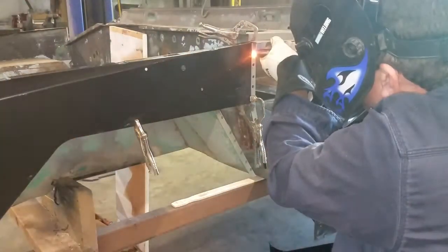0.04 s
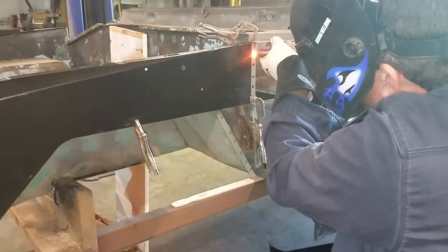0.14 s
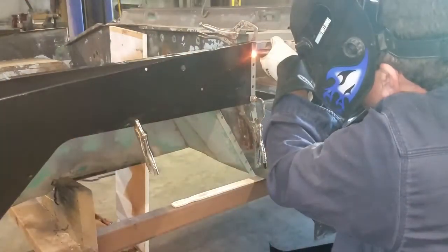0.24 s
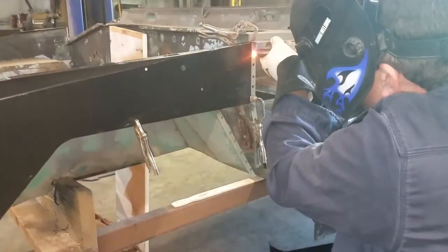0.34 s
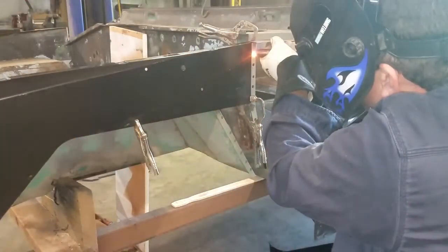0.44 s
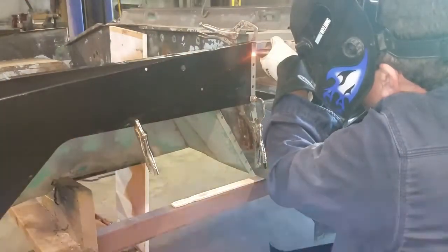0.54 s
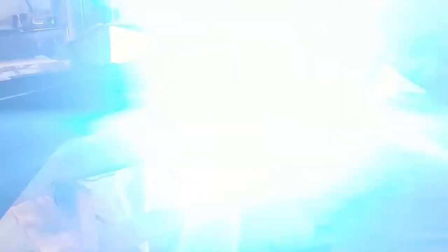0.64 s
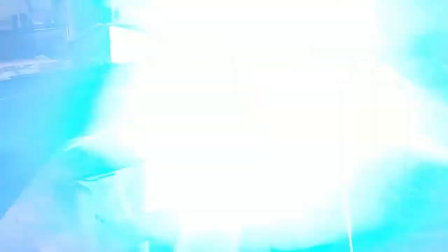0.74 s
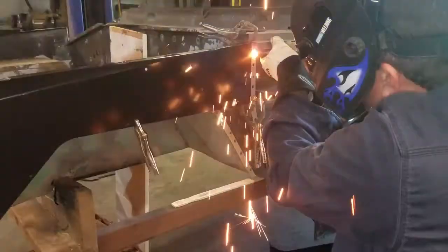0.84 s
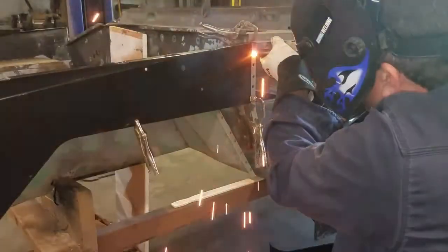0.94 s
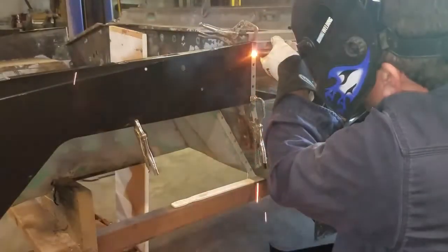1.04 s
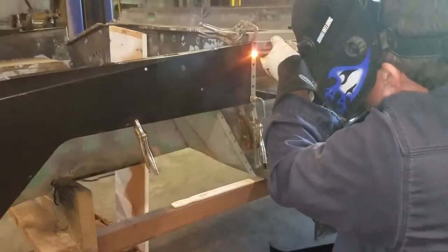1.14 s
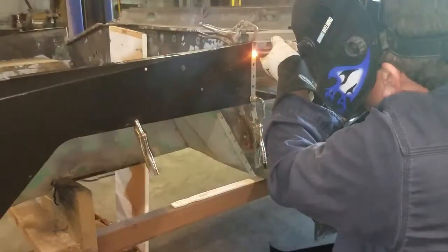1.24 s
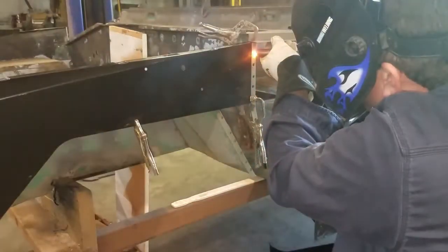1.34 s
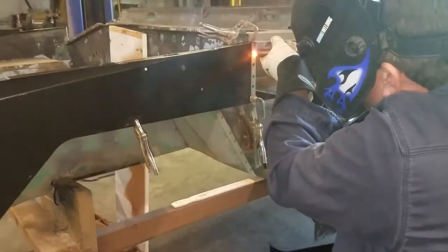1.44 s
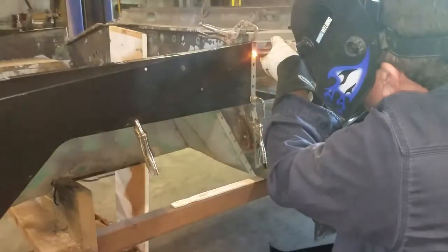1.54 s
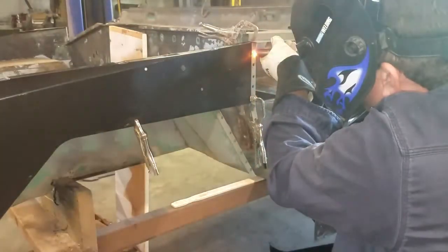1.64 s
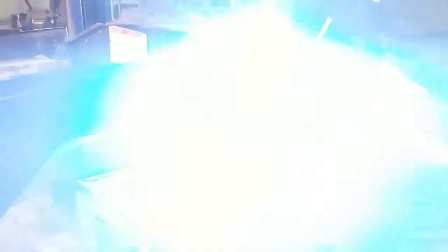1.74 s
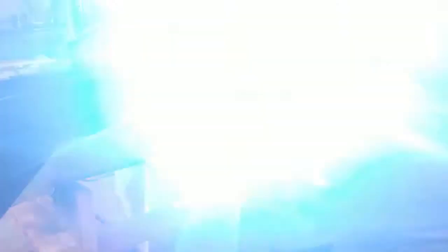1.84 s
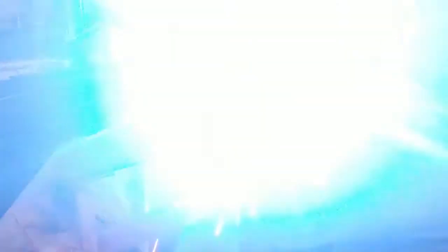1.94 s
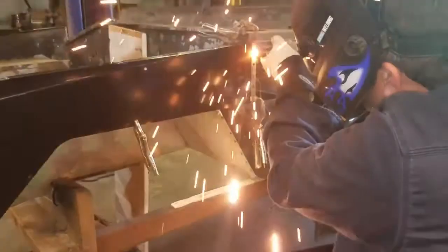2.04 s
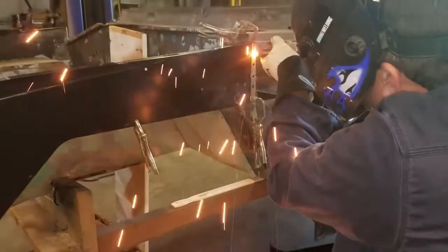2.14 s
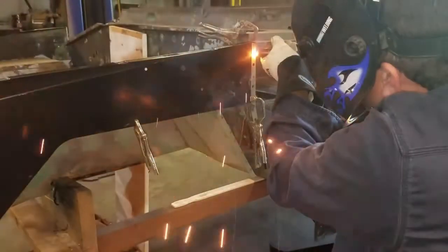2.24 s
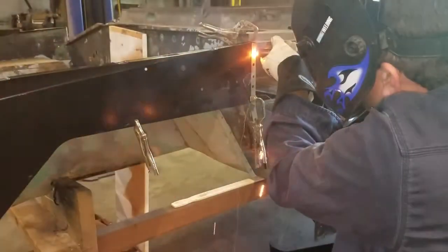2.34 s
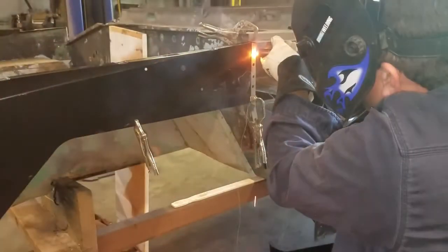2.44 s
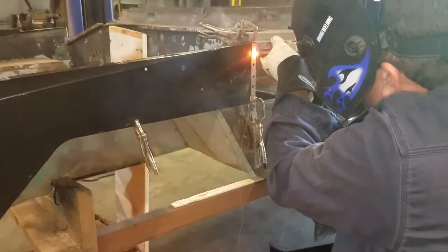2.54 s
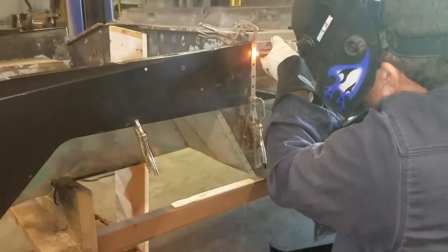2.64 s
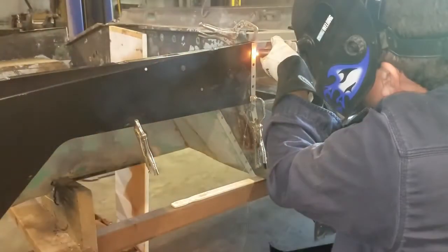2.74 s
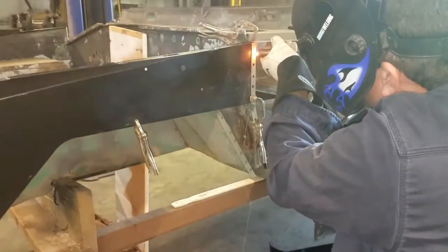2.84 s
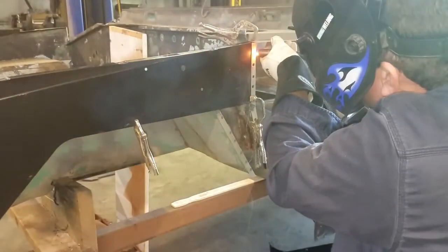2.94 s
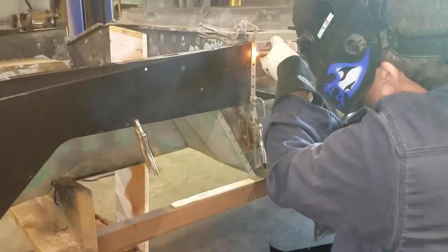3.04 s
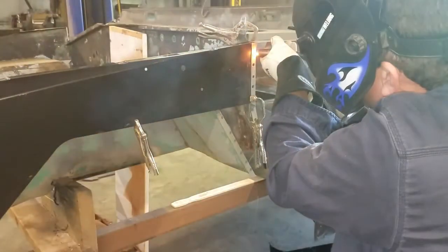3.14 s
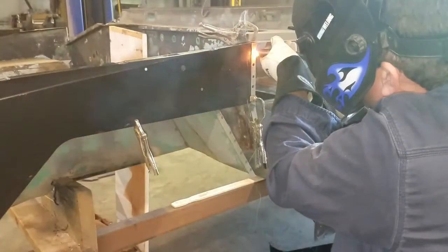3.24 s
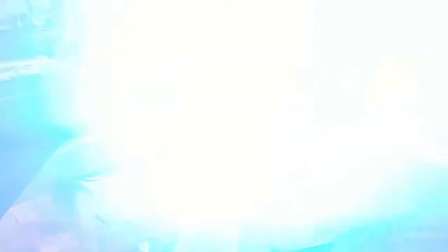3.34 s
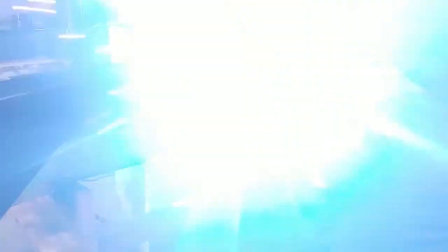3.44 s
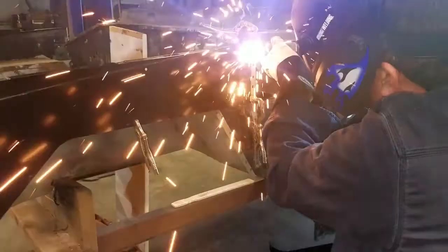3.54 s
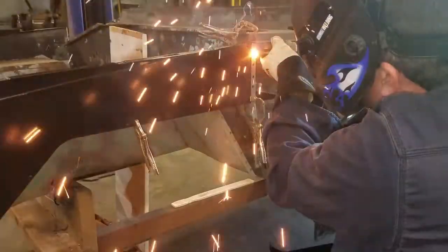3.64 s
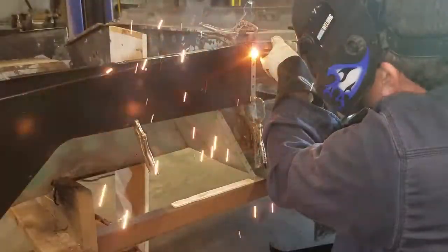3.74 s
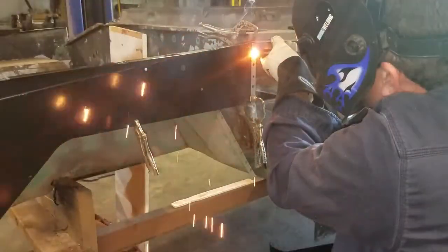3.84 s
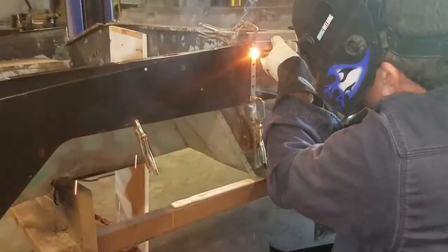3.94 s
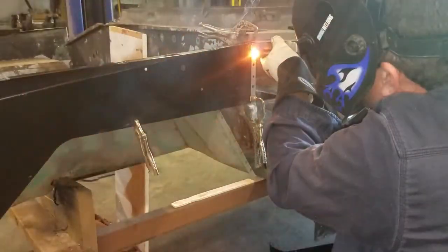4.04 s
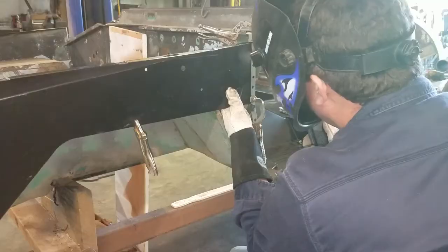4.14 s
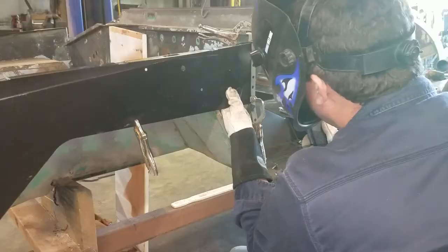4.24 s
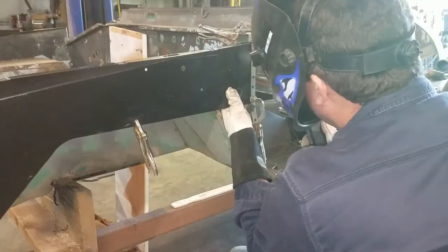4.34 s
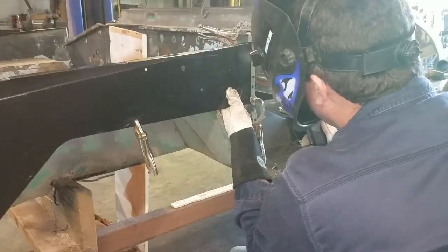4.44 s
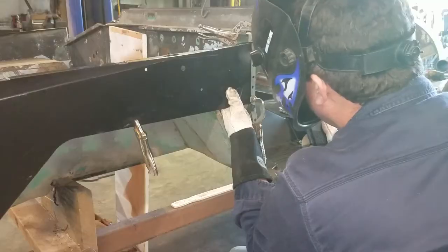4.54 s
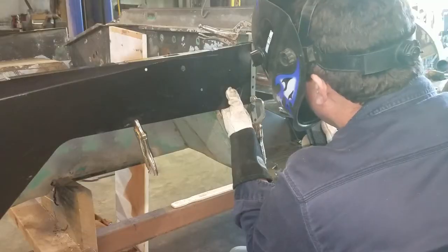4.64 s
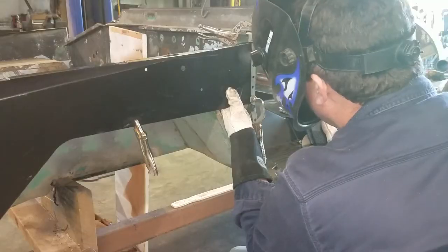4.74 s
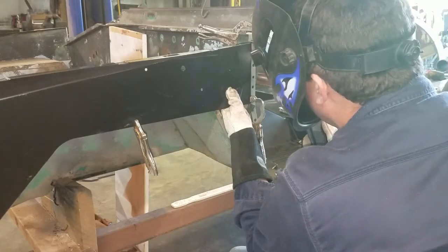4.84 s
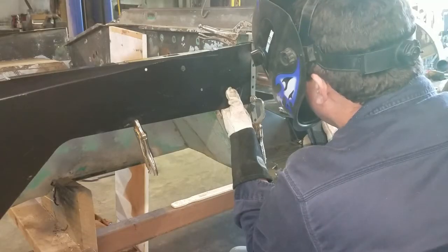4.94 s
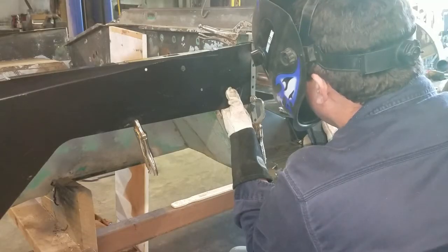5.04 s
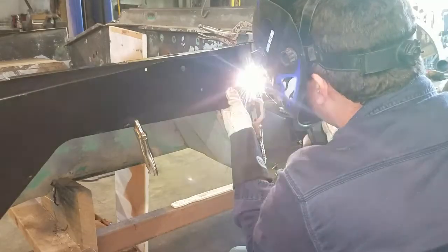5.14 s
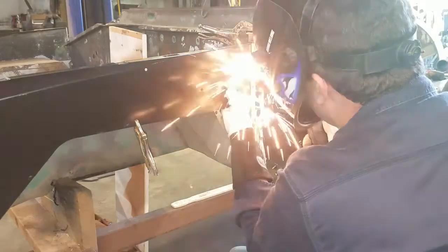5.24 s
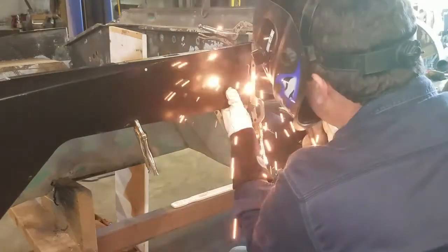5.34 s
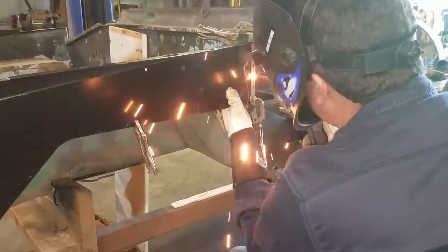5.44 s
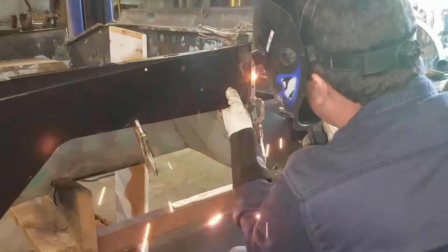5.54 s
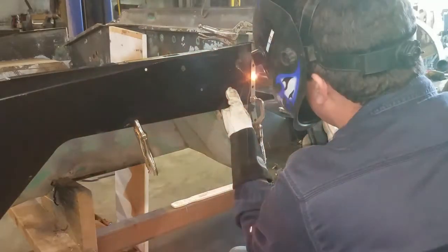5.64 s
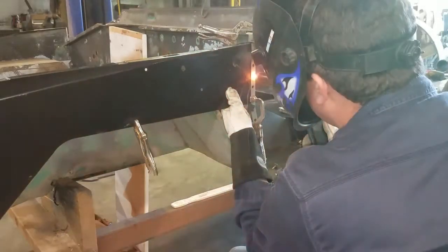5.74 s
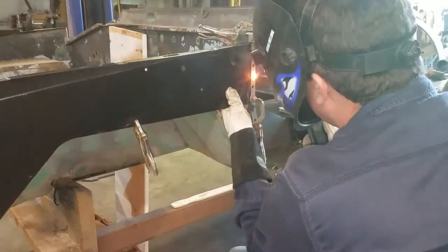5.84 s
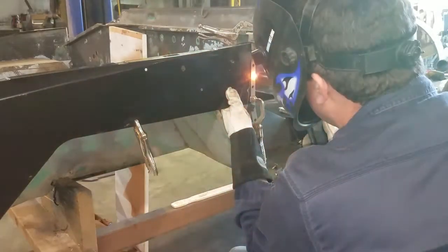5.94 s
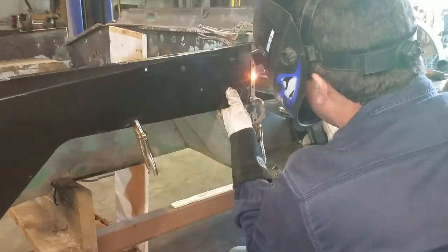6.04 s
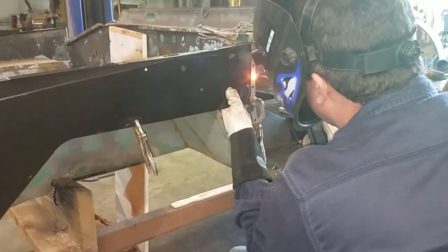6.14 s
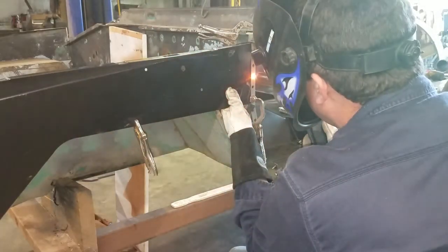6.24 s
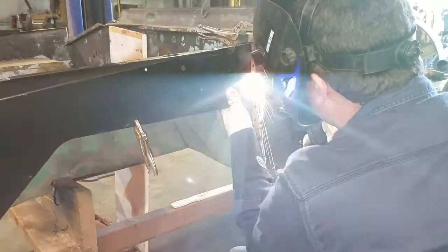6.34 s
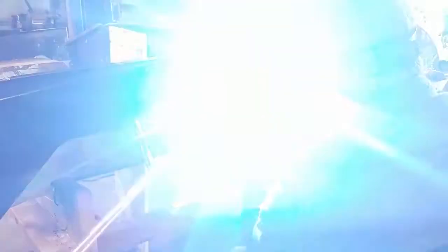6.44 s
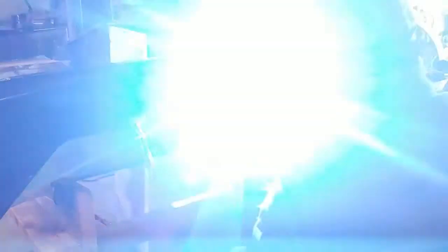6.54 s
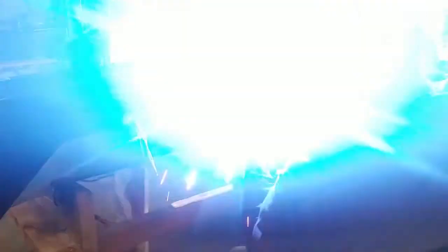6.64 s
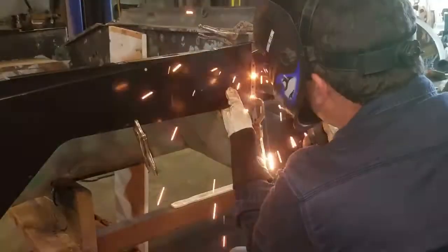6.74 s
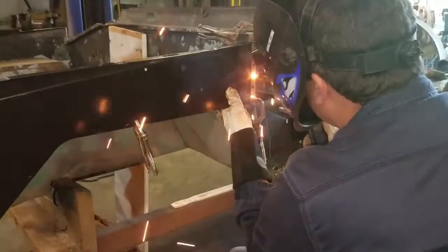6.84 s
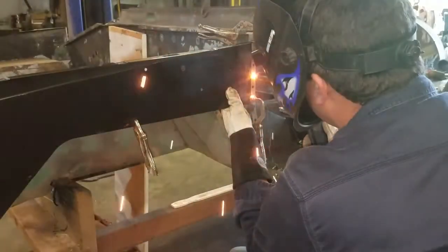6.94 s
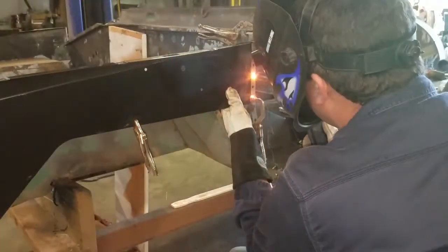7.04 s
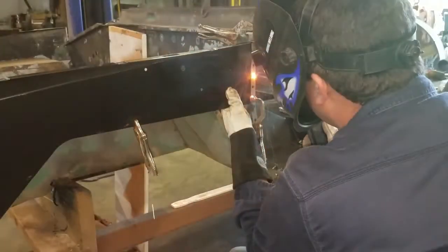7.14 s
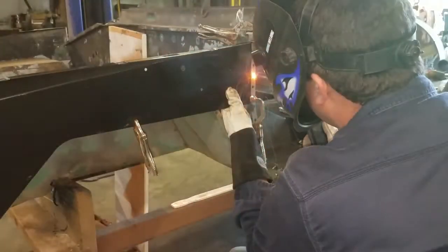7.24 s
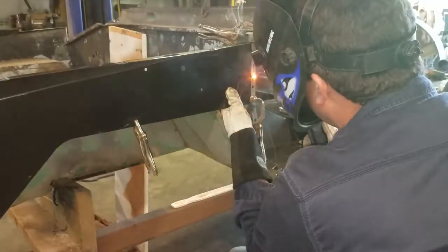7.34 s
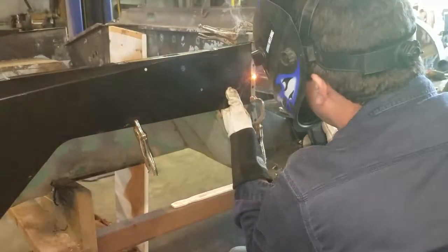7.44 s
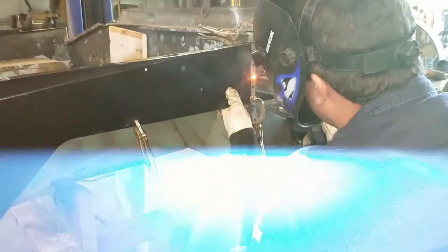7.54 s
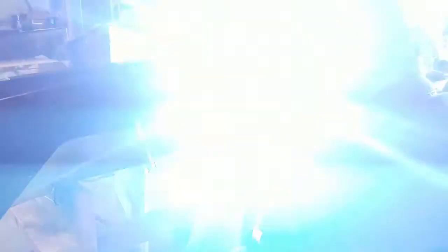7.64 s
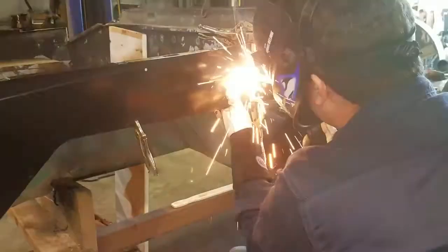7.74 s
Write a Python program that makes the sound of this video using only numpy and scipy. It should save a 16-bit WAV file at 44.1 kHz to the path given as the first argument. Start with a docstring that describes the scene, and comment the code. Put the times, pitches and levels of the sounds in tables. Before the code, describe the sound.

Heard in stereo close to the torch, six brief arc welds crackle on sheet steel, a little over a second apart. Each starts with a puff of gas and breaks into sputtering, frying and loud thumping pops, with a short workshop echo. In the gaps are the idling welder's low hum, a couple of spatter ticks and a faint, faraway bird. The hum turns heavier just before the fourth weld, where the wire sticks with a quick squeal.

```python
"""Six short spot welds on sheet steel in a small workshop, a stereo microphone close to the torch.
At first the idling wire-feed welder hums and a bird sings faintly, far off outside. From half a second
in, each weld opens with a burst of hiss that settles and whistles; the arc strikes, pops and sizzles,
steel and room ring out, and the background dips. Spatter ticks after welds two and three. Near 4 s the
background jumps back with a heavier rumble; in the fourth weld the wire sticks and squeals; two follow."""
import sys
import numpy as np
from scipy import signal
from scipy.fft import rfft, irfft, next_fast_len
from scipy.io import wavfile

SR = 44100
rng = np.random.default_rng(int(sys.argv[2]) if len(sys.argv) > 2 else 0)


def to_wav(sig):
    """Store sig (one row per channel, or 1-D mono) as 16-bit WAV at the path in sys.argv[1].

    Samples outside -1..1 are clipped; the rate is SR.
    """
    pcm = np.clip(np.atleast_2d(sig), -1, 1) * 32767
    pcm = np.round(pcm).astype(np.int16)
    wavfile.write(sys.argv[1], SR, pcm.T)  # frames by channels


N = 343980
JUMP_S = 4.119  # the background comes straight back up here

# the welds: (trigger [s], gas off [s], relative burst level [dB], relative flow level [dB],
# relative whistle level [dB], how freely the sheet rings at that spot [dB], background dip [dB])
SPOT_WELDS = [(0.515, 0.789, -25, -33.5, -36.5, -7.5, 9), (1.691, 1.949, -33.5, -35, -40, -7, 13),
              (3.191, 3.53, -25, -36.5, -38, -5.5, 11.5), (5.047, 5.305, -24, -37, -41, -1, 8.5),
              (6.322, 6.67, -27, -35.5, -41.5, 5.5, 9), (7.522, 7.79, -27.5, -37.5, -41, 11.5, 5)]
# the arc strikes or a big drop blows apart: (time [s], crack size [1.3 dB steps], thump energy [dB])
LOUD_POPS = [(0.5876, 0, -18), (0.6106, 9.5, -1.5), (0.6389, 1, -16), (0.684, 2.5, -11.5), (0.7014, 2, -16),
             (0.7277, 3.5, -6.5), (0.7432, 1.5, -12.5), (0.7524, 5.5, -10.5), (0.771, 0.5, -13),
             (1.7692, 3.5, -11), (1.8211, 3.5, -4), (1.8432, 1.5, 0.5), (1.928, 2.5, -5.5),
             (1.9345, 3.5, 2.5), (3.3285, 9.5, -2), (3.3595, 1.5, -11), (3.3692, 3.5, -2.5),
             (3.3785, 4, -2), (3.3869, 2.5, 6), (3.4058, 2, -3), (3.431, 3.5, 2.5), (3.4446, 0, -7.5),
             (3.4695, 0.5, -5), (5.2074, 8, 1.5), (6.3763, 2.5, -15.5), (6.4335, 5, -7), (6.4857, 3, -16.5),
             (6.5249, 1.5, -16), (6.6271, 2, -10), (7.5831, 3, -26), (7.7288, 3.5, -14)]
# the arc burns: (start [s], end [s], sizzle level [dB], crack size [1.3 dB steps], thump energy [dB])
ARC_BURNS = [(.59, .604, -28, -6.5, -26), (0.618, .72, -26, -1, -20), (1.776, 1.82, -33.5, -13.5, -28.5),
             (1.835, 1.922, -29.5, -1, -15), (3.336, 3.53, -27.5, -1, -12.5), (5.165, 5.173, -24, -6, -26),
             (5.212, 5.266, -25, -12, -28.5), (6.381, 6.399, -23, -12.5, -28.5),
             (6.44, 6.513, -24.5, -4, -16.5), (6.585, 6.648, -31.5, -2, -18),
             (7.656, 7.704, -23.5, -5.5, -22)]


def from_db(db):
    """Decibels to gain."""
    return 10 ** (np.asarray(db) / 20)


def unit_energy(x):
    """Scale each channel to a sum of squares of one."""
    return x / np.sqrt(np.sum(x ** 2, axis=-1, keepdims=True) + 1e-20)


def at_hz(points, hz):
    """Read a table on a log-frequency axis."""
    table = np.array(points)
    return np.interp(np.log(np.maximum(hz, 1)), np.log(table[:, 0]), table[:, 1])


def seconds():
    """The time of every sample."""
    return np.arange(N) / SR


def filtered(x, hz, kind, order=1):
    """Butterworth low- or high-pass."""
    return signal.sosfilt(signal.butter(order, hz, kind, fs=SR, output="sos"), x + 1e-18)


def resonance(x, hz, width_hz):
    """Band-pass with gain 1 at its peak."""
    r = np.exp(-np.pi * width_hz / SR)
    feedback = [1, -2 * r * np.cos(2 * np.pi * hz / SR), r * r]
    return signal.lfilter(np.array([1, 0, -1]) * (1 - r * r) / 2, feedback, x)


def stereo(mid, side, alike):
    """Mix two independent noises into left and right with the correlation `alike`."""
    return (np.sqrt(1 + alike) * mid + np.sqrt(1 - alike) * side * [[1], [-1]]) / np.sqrt(2)


def stereo_white(size, alike):
    """Two white noises with the given correlation."""
    return stereo(*rng.standard_normal((2, size)), alike)


def noise(spectrum, alike):
    """Stereo noise of a given colour, rms 1."""
    size = next_fast_len(N)
    colour = from_db(at_hz(spectrum, np.fft.rfftfreq(size, 1 / SR)))
    shaped = irfft(rfft(stereo_white(size, alike)) * colour, size)
    return unit_energy(shaped[:, :N]) * np.sqrt(N)


def flutter(rate_hz, depth_db):
    """A gain that wanders at random, rms 1."""
    knots = np.interp(seconds() * rate_hz, np.arange(N // 10), rng.standard_normal(N // 10))
    return unit_energy(from_db(depth_db * knots)) * np.sqrt(N)


def gates(rows, rise_s, fall_s):
    """Envelope of (start [s], end [s], level [dB]) rows: a quick rise, a hold, an exponential fall."""
    t, out = seconds(), np.zeros(N)
    for start, end, level_db in rows:
        span = slice(int(start * SR), int((end + .5) * SR))
        rise = np.clip((t[span] - start) / rise_s, 0, 1)
        fall = np.exp(-np.maximum(t[span] - end, 0) / fall_s)
        out[span] += from_db(level_db) * rise * fall
    return out


def add(out, at_s, sound):
    """Mix a sound in at a time."""
    start = round(at_s * SR)
    out[..., start:start + sound.shape[-1]] += sound[..., :max(N - start, 0)]


def glide(length_s, from_hz, to_hz, waver, bend):
    """A rough whistle that slides quickly at first and then levels out."""
    progress = np.linspace(0, 1, int(length_s * SR))
    wobble = np.interp(progress, np.linspace(0, 1, 60), rng.standard_normal(60))
    hz = (to_hz + (from_hz - to_hz) * (1 - progress) ** bend) * (1 + waver * wobble)
    return np.sqrt(np.abs(np.sin(np.pi * progress))) * np.sin(2 * np.pi * np.cumsum(hz) / SR)


def room_tone(surge_hold_s=1.53, surge_fade_s=.46):
    """Rumble and mains hum of the idling welder, with a heavier rumble from the jump that holds and fades; the
    air of its fan; a fine hiss."""
    # mains harmonics: (frequency [Hz], relative level [dB])
    harmonics = [(120, -5), (240, -11.5), (360, -19), (540, -22), (600, -20)]
    # spectra of rumble, fan and hiss: (frequency [Hz], relative density [dB])
    rumble_spectrum = [(20, -11.5), (50, 8), (90, 14.5), (130, 8), (190, 2.5), (400, -46)]
    fan_spectrum = [(100, -13), (230, -2), (380, 0), (700, -3), (1200, -10.5), (2500, -11.5), (5000, -25.5),
                    (10000, -42.5)]
    hiss_spectrum = [(1500, -14), (4000, -3), (6000, -9), (7700, -3), (9200, -10.5), (11500, -3),
                     (14500, 7), (16000, -2.5)]
    t, hum = seconds(), 0
    for hz, level_db in harmonics:
        phase = 2 * np.pi * (hz * t + rng.random()) + rng.normal(size=(2, 1)) / 2
        hum += from_db(level_db) * np.sqrt(2) * np.sin(phase)
    rumble = from_db(-2.5) * noise(rumble_spectrum, alike=.082)
    drone = rumble + hum * flutter(rate_hz=15, depth_db=4.5)
    surge = (t > JUMP_S) * np.exp(-np.maximum(t - JUMP_S - surge_hold_s, 0) / surge_fade_s)
    air = noise(fan_spectrum, alike=.24) + noise(hiss_spectrum, alike=.034)
    return (from_db(-64.5) + from_db(-52.5) * surge) * drone + from_db(-63.5) * air


def dips(onset_s=.29, hold_s=.5, recover_s=.28):
    """Gain of everything distant: it sinks under each weld, holds and recovers; the jump ends a dip."""
    t, sunk_db = seconds(), np.zeros(N)
    for on, off, *_, depth_db in SPOT_WELDS:
        sink = np.clip((t - on) / onset_s, 0, 1)
        release = np.exp(-np.maximum(t - off - hold_s, 0) / recover_s)
        active = (on > JUMP_S) | (t < JUMP_S)
        sunk_db = np.maximum(sunk_db, depth_db * sink * release * active)
    return from_db(-sunk_db)


def bird(waver=.034):
    """Outside, a bird slurs two whistled phrases; one that straddles the jump is heard only from there."""
    # notes: (delay [s], length [s], start pitch [Hz], end pitch [Hz], relative level [dB], bend [exponent])
    call = [(0, .09, 1960, 2608, -1.5, 1.8), (.075, .08, 3800, 3674, -3, 1.5)]
    warble = [(0, 0.07, 4020, 4206, -10, 2), (.076, .11, 2460, 2067, -7, 1.5),
              (.247, .165, 2620, 3450, -1, 3.5), (.422, .036, 3670, 4106, -3, 2)]
    # when it sings each phrase: (time [s], relative level [dB])
    call_times = [(.02, -55.5), (0.297, -54.5), (1.136, -57.5), (1.404, -59), (4.042, -51.5),
                  (4.312, -54.5), (4.592, -59)]
    warble_times = [(2.695, -57.5), (7.303, -57)]
    out = np.zeros((2, N))
    for phrase, times in ((call, call_times), (warble, warble_times)):
        phrase_s = phrase[-1][0] + phrase[-1][1]
        for at_s, level_db in times:
            heard_from_s = JUMP_S if at_s < JUMP_S < at_s + phrase_s else 0
            for delay_s, length_s, from_hz, to_hz, note_db, bend in phrase:
                note = glide(length_s, from_hz, to_hz, waver, bend)
                heard = at_s + delay_s + np.arange(len(note)) / SR >= heard_from_s
                add(out, at_s + delay_s, from_db(level_db + note_db) * note * heard)
    return out


def workshop(x, first_echo_s=.0021, build_s=.001):
    """Dense reflections from bench and walls; each half-octave dies at its own rate."""
    # the room's decay: (frequency [Hz], t60 [s])
    decay_times = [(100, 0.8), (400, 0.63), (1000, 0.38), (3000, 0.3861), (7700, 0.47), (11000, 0.3552),
                   (16000, 0.43)]
    # its colour: (frequency [Hz], relative level [dB])
    colour = [(60, -34), (150, -5.5), (400, -4), (1000, -3), (3000, 0), (5500, 0), (8000, -2), (9300, 1),
              (12000, 5.5), (16000, 2.5)]
    # likeness of left and right at the microphone: (frequency [Hz], correlation [-1 to 1])
    likeness = [(100, -.1), (250, 0.1), (600, 0.61), (2000, .45), (4000, .2), (8000, .3), (13000, 0)]
    t, bins = np.arange(SR) / SR, np.fft.rfftfreq(SR, 1 / SR)
    mid, side = rfft(rng.standard_normal((2, SR)))
    spectrum = stereo(mid, side, at_hz(likeness, bins)) * from_db(at_hz(colour, bins)) / np.sqrt(SR)
    edges_hz, tail = 30 * 2 ** np.arange(0, 10, .5), 0
    for low, high in zip(edges_hz, edges_hz[1:]):
        t60 = at_hz(decay_times, np.sqrt(low * high))
        band = irfft(spectrum * ((bins >= low) & (bins < high)), SR)
        tail += band * from_db(-60 * t / t60) * np.sqrt(np.log(1e6) / t60)  # same energy at any t60
    build_up = np.clip((t - first_echo_s) / build_s, 0, 1)
    return signal.fftconvolve(x, tail * build_up, axes=1)[:, :N]


def near_echoes(x):
    """The direct sound, and its repeats off hard surfaces near the torch within a few milliseconds."""
    # off helmet and sheet: (left delay [s], right delay [s], level [dB])
    reflections = [(.00205, 0.0016, -17), (.0044, .0049, -15), (.0063, .0058, -22)]
    out = x.copy()
    for left_s, right_s, level_db in reflections:
        add(out[0], left_s, from_db(level_db) * x[0])
        add(out[1], right_s, from_db(level_db) * x[1])
    return out


def steel(drive):
    """Each mode of the sheet soaks up energy from the weld and gives it back as a fading tone."""
    # the sheet's modes: (frequency [Hz], gain [dB], t60 [s])
    modes = [(355, -62, .65), (410, -61, .5), (602, -66, .5), (958, -73, 1.2)]
    spots = [(on, off, ring_db) for on, off, *_, ring_db, _ in SPOT_WELDS]
    coupling = gates(spots, rise_s=.01, fall_s=.1)
    power = np.mean((coupling * drive) ** 2, axis=0)
    t, out = seconds(), 0
    for hz, gain_db, t60 in modes:
        kept_per_sample = 1e-6 ** (1 / (t60 * SR))
        stored = signal.lfilter([1], [1, -kept_per_sample], power + 1e-18)
        tone = np.sin(2 * np.pi * hz * t + rng.normal(size=(2, 1)) / 2)
        out += from_db(gain_db) * np.sqrt(stored) * tone
    return out


def spatter():
    """Beads of metal tick on bench and floor."""
    # landings: (time [s], energy before the low-pass [dB])
    landings = [(2.305, -27), (2.425, -39.5), (3.625, -7.5)]
    out = np.zeros((2, N))
    for at_s, energy_db in landings:
        add(out, at_s, from_db(energy_db) * crack(scatter_s=.021, scatter_db=9, low_cut_hz=300))
    return filtered(out, 2200, "low")


def low_booms(fall_s=.0037, growth=1.3):
    """Each loud pop brings a short low boom, different in left and right, louder with its thump."""
    t, out = np.arange(SR // 10) / SR, np.zeros((2, N))
    for at_s, _, thump_db in LOUD_POPS:
        burst = stereo_white(len(t), alike=-.11) * np.exp(-t / fall_s)
        boom = filtered(filtered(burst, 170, "low", order=2), 55, "high", order=2)
        add(out, at_s, from_db(growth * thump_db - 8) * unit_energy(boom))
    return out


def gas(onset_s=.0025, whistle_delay_s=.02):
    """Each weld opens with a brief loud burst of hiss; the steady gas flow then whistles in the nozzle."""
    # spectra of burst and flow: (frequency [Hz], relative density [dB])
    burst_spectrum = [(60, -23), (300, -18), (700, -7), (1000, 4), (1600, -5), (2600, 1), (4000, -5),
                      (5500, -15), (7500, -9), (10000, -18), (16000, -12)]
    flow_spectrum = [(60, -15.5), (150, -6.5), (400, 4), (800, 0), (1600, -2.5), (3300, -3), (5000, -11),
                     (7500, -0.5), (10000, -10), (16000, -6)]
    # nozzle resonances: (frequency [Hz], half-width of each filter pass [Hz], relative level [dB])
    nozzle_modes = [(3280, 200, 2), (6300, 350, 2.5)]
    on, off, burst_db, flow_db, whistle_db, *_ = np.transpose(SPOT_WELDS)
    burst = gates(zip(on, on + onset_s, burst_db), onset_s, fall_s=.027) * noise(burst_spectrum, alike=.59)
    flow = gates(zip(on, off, flow_db), onset_s, fall_s=.0089) * noise(flow_spectrum, alike=.17)
    flow *= flutter(rate_hz=120, depth_db=.5)
    white = stereo_white(N, alike=.38)
    tone = sum(from_db(db) * resonance(resonance(white, hz, 2 * half_width), hz, 2 * half_width)
               for hz, half_width, db in nozzle_modes)
    blowing = gates(zip(on + whistle_delay_s, off, whistle_db), rise_s=.03, fall_s=.0063)
    whistle = blowing * unit_energy(tone) * np.sqrt(N) * flutter(rate_hz=140, depth_db=-2)
    return from_db(1) * burst + from_db(-1.5) * flow + from_db(.5) * whistle


def squeal(at_s=5.17, level_db=-34):
    """The wire sticks once and melts with a falling squeal before the arc breaks through."""
    out = np.zeros((2, N))
    add(out, at_s, from_db(level_db) * glide(.034, from_hz=4600, to_hz=450, waver=.25, bend=1.2))
    return out


def sizzle(fade_db_per_s=55):
    """Between the pops the arc fries in fine grains, calming as the pool forms."""
    # spectrum of the frying: (frequency [Hz], relative density [dB])
    spectrum = [(100, -13.5), (1000, -13.5), (3500, 3), (5500, -1.5), (8000, 10), (9300, -3), (12000, 1),
                (16000, 1.5)]
    t, frying = seconds(), 0
    for start, end, level_db, *_ in ARC_BURNS:
        calming = from_db(-fade_db_per_s * np.clip(t - start, 0, 1))
        frying += gates([(start, end, level_db)], rise_s=.0016, fall_s=.0053) * calming
    grains = flutter(rate_hz=1500, depth_db=4)
    return frying * grains * noise(spectrum, alike=.36)


def sputter():
    """The wire stubs and burbles where it meets cold steel."""
    # stubs on the sheet: (start [s], end [s], pitch [Hz], level [dB])
    stubs = [(0.547, .58, 447, -47), (1.73, 1.766, 419.7, -39.5), (1.785, 1.803, 654, -31),
             (3.217, 3.259, 396, -42.5), (3.317, 3.333, 412, -31.5), (5.077, 5.154, 350, -38),
             (5.179, 5.2, 600, -29.5), (5.204, 5.271, 167, -35), (6.372, 6.394, 449, -31.5),
             (7.564, 7.596, 645, -33.5), (7.59, 7.761, 279.6, -39)]
    out, white = np.zeros((2, N)), stereo_white(N, alike=.45)
    spits = flutter(rate_hz=240, depth_db=3.5)
    for start, end, hz, level_db in stubs:
        burble = unit_energy(resonance(resonance(white, hz, 1.3 * hz), hz, 1.3 * hz)) * np.sqrt(N)
        out += gates([(start, end, level_db)], rise_s=.0017, fall_s=.012) * spits * burble
    return out


def crack(scatter_s, scatter_db=0, low_cut_hz=500, lag_s=.00002):
    """A shock front about 0.1 ms wide, then its scatter off torch, helmet and sheet; unit energy."""
    # peaks that colour the crack: (frequency [Hz], width [Hz], gain [dB])
    peaks = [(3320, 340, -10.5), (8100, 510, 7), (13900, 9700, -8.5)]
    t = np.arange(SR // 50) / SR
    front = unit_energy(filtered(1. * (t == 0), 5500, "low", order=2))
    front = np.array([np.interp(t - lag_s, t, front, left=0), front])  # reaches the right side first
    scatter = unit_energy(stereo_white(len(t), alike=.29) * np.exp(-t / scatter_s))
    shock = filtered(front + from_db(scatter_db) * scatter, low_cut_hz, "high")
    return unit_energy(shock + sum(from_db(db) * resonance(shock, hz, width) for hz, width, db in peaks))


def thump(energy_db, corner_at_0db_hz=700, db_per_octave=14):
    """The suction behind the shock: the bigger the blown drop, the longer and deeper it is."""
    click = 1. * (np.arange(SR // 50) == 0)
    corner_hz = corner_at_0db_hz * 2 ** (-energy_db / db_per_octave)
    pulse = filtered(filtered(click, corner_hz, "low"), 1800, "low")
    suction = filtered(pulse, 82, "high", order=2)
    return -from_db(energy_db) * unit_energy(suction)


def short_circuits(rate_hz=120, jitter_s=.0006, miss_share=.15, clearance_s=.005):
    """The wire shorts unevenly on the crests of the rectified mains; rows as in LOUD_POPS."""
    rows, loud_s = [], np.array(LOUD_POPS)[:, 0]
    for start, end, _, crack_size, thump_db in ARC_BURNS:
        for crest_s in np.arange(start, end, 1 / rate_hz):
            late, strength = rng.standard_normal(2)
            change = 2 * strength - 13 * (crest_s - start)  # gentler as the pool forms
            if rng.random() > miss_share and np.abs(loud_s - crest_s).min() > clearance_s:
                rows.append((crest_s + jitter_s * late, crack_size + change, thump_db + 2 * change))
    return rows


def pops(db_per_step=1.3):
    """Every short circuit ends in a crack and a thump; the big ones blast harder."""
    out = np.zeros((2, N))
    for at_s, crack_size, thump_db in list(LOUD_POPS) + short_circuits():
        crack_db = db_per_step * crack_size + 1.4
        add(out, at_s, from_db(crack_db) * crack(scatter_s=.0013) + thump(thump_db))
    return out


def scene():
    """The weld close to the microphone; the bird far off, heard mostly through the room."""
    distant_gain = dips()
    shop, song = distant_gain * room_tone(), distant_gain * bird()
    weld = sizzle() + sputter() + gas() + spatter() + squeal() + pops()
    room = workshop(from_db(-5) * weld + song)
    return shop + from_db(-13) * song + room + near_echoes(weld) + low_booms() + steel(weld)


def record(dry, ceiling=.74, cutoff_hz=15900):
    """The highest peaks are rounded and the top treble is cut."""
    rounded = ceiling * np.tanh(dry / ceiling)
    return signal.sosfilt(signal.ellip(12, .2, 80, cutoff_hz, fs=SR, output="sos"), rounded)


dry = scene()
out = record(dry)
to_wav(out)
```